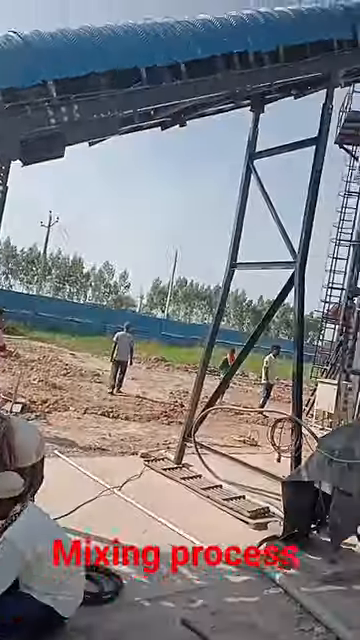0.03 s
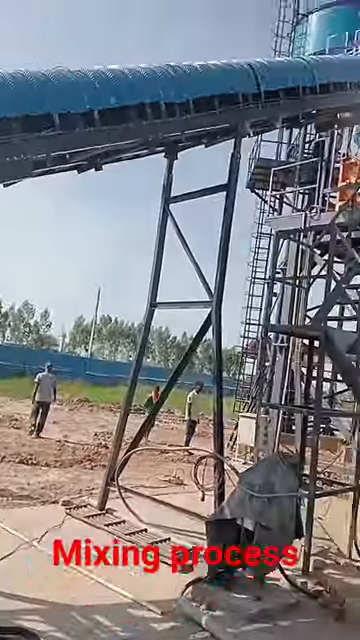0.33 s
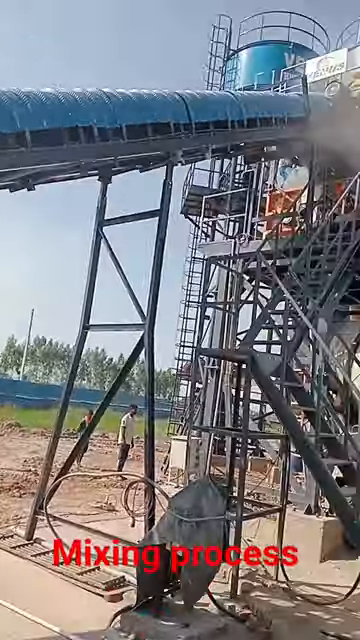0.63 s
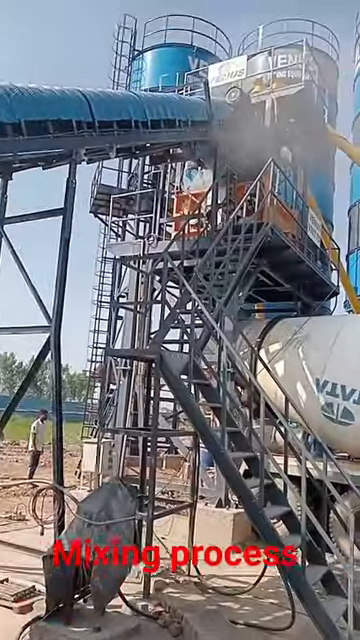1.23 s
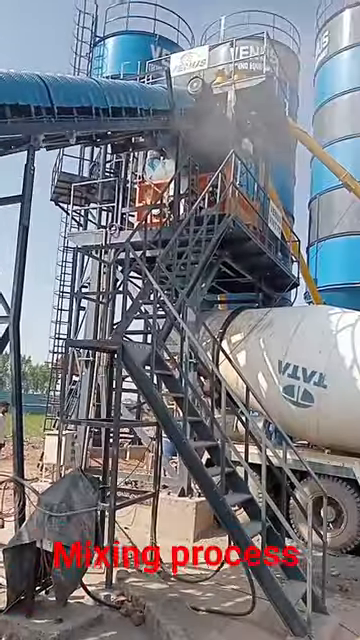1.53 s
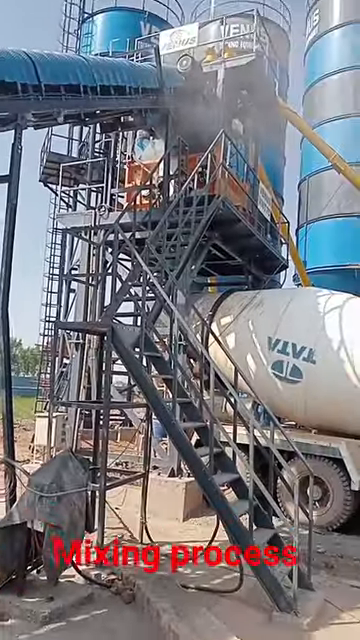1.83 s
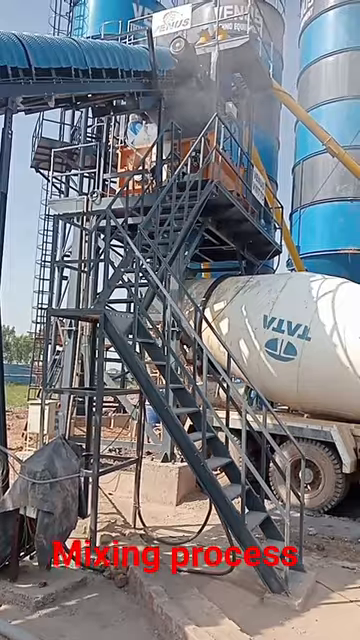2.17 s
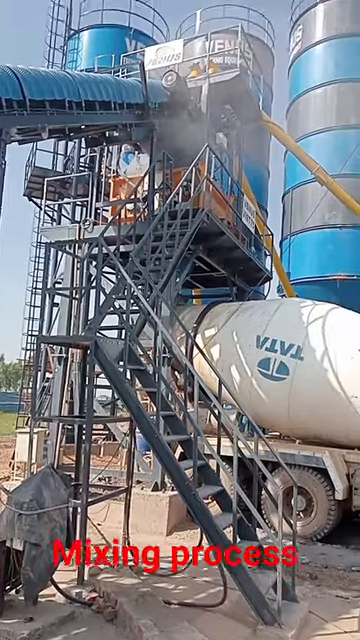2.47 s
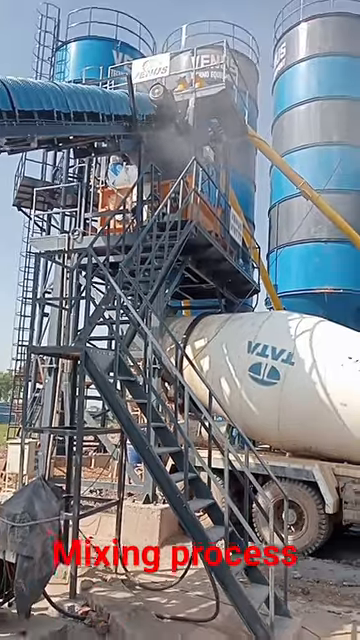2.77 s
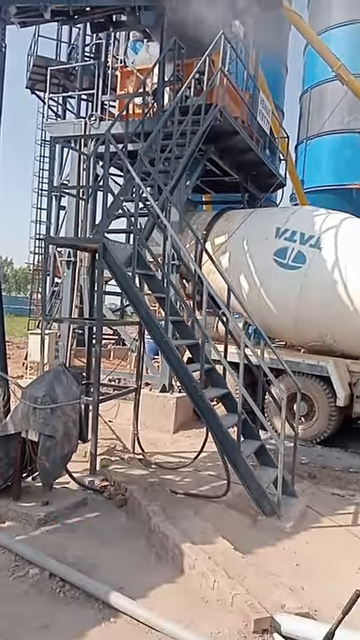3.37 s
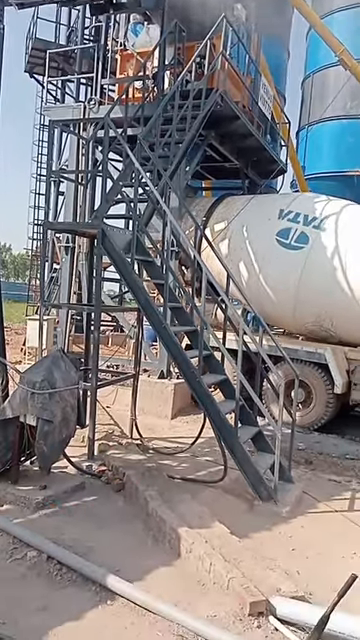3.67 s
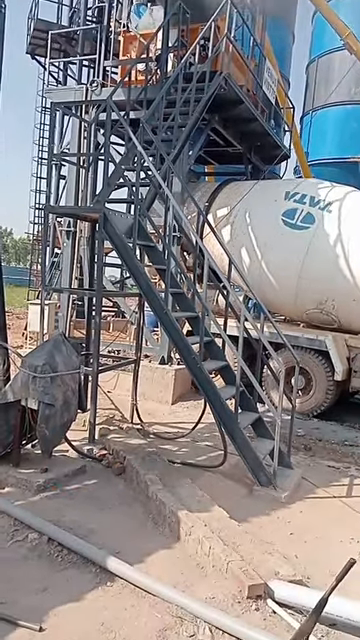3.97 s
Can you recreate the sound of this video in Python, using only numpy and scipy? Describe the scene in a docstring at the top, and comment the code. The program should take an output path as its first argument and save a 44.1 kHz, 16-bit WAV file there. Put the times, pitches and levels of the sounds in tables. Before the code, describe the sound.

A vibrating steel hopper rattles and drones at an outdoor concrete plant while gravel hisses down a chute and dry steel squeals. A mixer truck roars low behind it. Just before the end, the drone cuts out.

```python
"""Outdoors at a concrete batching plant, a steel hopper discharges into a mixer truck.
Shaken about a hundred times a second, the hopper rattles, drones and groans in forced vibration;
just before the end the drone cuts out and the rattle drops. Gravel and air hiss, scrape and chirp
down the chute, a thin whistle sinks as the air pressure falls, and dry steel squeals in pulses.
Behind them the mixer roars and booms softly over the truck's idling diesel."""
import sys
import numpy as np
from scipy import signal
from scipy.fft import rfft, irfft
from scipy.io import wavfile

SR = 44100
rng = np.random.default_rng(int(sys.argv[2]) if len(sys.argv) > 2 else 0)


def wav_record(signal):
    """Record a signal, one row per channel, as 16-bit PCM in the file named by sys.argv[1]."""
    frames = np.transpose(np.atleast_2d(signal))
    bounded = np.clip(frames, -1, 1)
    # unit amplitude maps onto the largest positive 16-bit level
    quanta = np.round(bounded * 32767).astype(np.int16)
    wavfile.write(sys.argv[1], SR, quanta)


N = 176400
SHAKE_HZ = 99.67

# Levels are in decibels; modes, partials and spectra are relative to their source's envelope.
# Envelope of the rattle: time_s, level_db
RATTLE_ENVELOPE = [(0, -23.5), (.54, -23.5), (.71, -23), (.92, -21.5), (1.28, -17.5), (1.42, -22),
                   (1.63, -16.5), (2.15, -17), (2.6, -18.5), (2.9, -21), (3.0, -17.5), (3.06, -21.5),
                   (3.42, -19), (3.64, -22), (3.88, -17.5), (3.93, -28.5)]
# Normal modes of the hopper: pitch_hz, bandwidth_hz, level_db
HOPPER_MODES = [(726, 58, -6), (815, 68, -0.5), (877.7, 57, -0.5), (979, 131, -2.5), (1116, 124, -7.5),
                (1447, 61, -13), (1730, 165, -13), (1865, 140, -12)]
# Tones that ring with the rattle: pitch_hz, level_db
RINGING_TONES = [(712, -14.5), (801, -11.5), (817, -10), (887, -19.5), (990, -9.5), (1114, -17.5)]
# Envelope of the drone: time_s, level_db
DRONE_ENVELOPE = [(0, -52), (.22, -36.5), (.57, -24), (.62, -50), (.8, -35), (1.14, -37), (1.28, -26.5),
                  (1.62, -24), (2.34, -24), (2.47, -33), (2.54, -24), (3.87, -27.5), (3.91, -53)]
# Weaker partials beside the drone's main tone: pitch_hz, level_db
DRONE_PARTIALS = [(606, -8.5), (395, -25.5)]
# Groans of the hopper's plates: centre_s, length_s, pitch_hz, level_db
GROANS = [(0.146, 0.47, 745, -31), (0.218, 0.18, 992, -27), (.64, 0.15, 995, -25),
          (0.774, 0.096, 745, -24.5), (0.776, 0.062, 845, -19.5), (1.003, 0.36, 828, -22.5),
          (1.084, 0.054, 1120, -20), (1.2, .08, 865, -30), (1.52, 0.13, 1000, -21), (3.156, 0.11, 998, -17)]
# Envelopes of the chute's two hiss bands: time_s, low_level_db, high_level_db
HISS_ENVELOPES = [(0.0, -21, -24), (0.25, -22, -23.5), (1.06, -20.5, -24), (2.45, -20.5, -25),
                  (2.85, -22.5, -26.5), (3.1, -23, -25.5), (4.0, -24.5, -25)]
# Spectral density of the lower hiss: frequency_hz, level_db
LOW_HISS_SPECTRUM = [(1200, -1), (2000, 4), (2250, -4), (2500, 2), (3200, -1), (3850, -1.5), (4400, -4),
                     (4750, -2), (6000, 0), (7000, -1.5)]
# Spectral density of the upper hiss: frequency_hz, level_db
HIGH_HISS_SPECTRUM = [(7000, 5), (7450, 0.5), (8700, 1.5), (9400, 0), (10700, 1.5), (12500, -3.5),
                      (15400, -5)]
# Normal modes of the chute: pitch_hz, bandwidth_hz, level_db
CHUTE_MODES = [(2473, 89, -3.5), (3524, 88, -4), (4770, 164, -0.5), (5250, 150, 5), (5470, 106, 0.5),
               (7090, 89, -12.5)]
# Scrapes of gravel: centre_s, length_s, pitch_hz, level_db
SCRAPES = [(1.84, 2.2, 13600, -35), (2.43, 0.16, 9400, -34), (2.43, 0.17, 9200, -31.5)]
# Glide of the air whistle: time_s, pitch_hz, level_db
WHISTLE_GLIDE = [(0, 9240, -41), (.1, 9140, -28.5), (.27, 8930, -27), (.33, 8900, -35), (.58, 8800, -30.5),
                 (.76, 8530, -38), (1.3, 8000, -41), (1.75, 7750, -37), (2.1, 7630, -44), (2.3, 7560, -60)]
# Squeals of dry steel: centre_s, length_s, pitch_hz, level_db
SQUEALS = [(0.155, 0.98, 4290, -32), (0.118, 0.28, 3630, -36), (.76, 0.55, 4104, -27),
           (1.127, 0.51, 4047, -28.5), (.95, .9, 7130, -32.5), (0.948, 0.48, 6240, -31),
           (1.0, 0.48, 5310, -30), (1.2, 0.79, 10700, -34.5), (1.57, 0.55, 9750, -32),
           (2.002, 0.79, 1830, -26), (2.002, 0.37, 7960, -35), (2.298, 1.3, 5230, -33.5),
           (2.398, 0.35, 3570, -31.5), (2.5, 0.11, 4680, -29.5), (2.995, 2, 4030, -37.5),
           (3.35, 0.86, 12270, -36)]
# Envelope of the mixer's roar: time_s, level_db
ROAR_ENVELOPE = [(0, -34.5), (2.2, -35), (2.45, -33.5), (3.4, -36)]
# Spectral density of the roar: frequency_hz, level_db
ROAR_SPECTRUM = [(25, -29), (45, -20), (65, -10), (110, -8), (150, -1.5), (220, 2.5), (275, -0.5), (340, 4),
                 (450, -1), (640, -3), (1300, -2), (2200, -18)]
# Booms of loads tumbling in the mixer: centre_s, level_db
BOOMS = [(2.48, -30.5), (3.0, -32.5)]
# Orders of the idling diesel: pitch_hz, level_db
ENGINE_ORDERS = [(62.7, -55), (75.3, -51), (100.3, -57.5), (199, -50.5)]


def hopper_rattle(jitter_s=0.001319, blow_spread_db=4, surge_db=0.74):
    """Impact excitation: each shake strikes every mode a loose blow, and some tones ring on."""
    shakes_s = np.arange(0, N / SR, 1 / SHAKE_HZ)
    plates = 0
    for hz, width_hz, db in HOPPER_MODES:
        lateness, strength = rng.standard_normal((2, 1024))[:, :len(shakes_s)]
        onsets = ((shakes_s + jitter_s * lateness) * SR).astype(int) % N
        blows = np.zeros(N)
        blows[onsets] = from_db(blow_spread_db * strength)
        mode = filtered(blows, lambda f: resonance(f, hz, width_hz) ** 2)
        plates += from_db(db) * np.sqrt(width_hz) * mode
    ringing = sum(from_db(db) * tone(hz, waver_db=2.5, wander_hz=5.1, rate_hz=7.6)
                  for hz, db in RINGING_TONES)
    drone_db, = curves(DRONE_ENVELOPE)
    ringing *= from_db(0.2 * (drone_db - drone_db.max()))  # strongest while the walls drone
    level_db, = curves(RATTLE_ENVELOPE)
    envelope = from_db(level_db + surge_db * drift(rate_hz=38))
    return envelope * (from_db(-1) * unit_power(plates) + ringing)


def hopper_drone(main_hz=501):
    """Forced vibration: the walls sing near harmonics of the shaking; the fifth meets a resonance."""
    level_db, = curves(DRONE_ENVELOPE)
    main = tone(main_hz, waver_db=1.5, wander_hz=2, rate_hz=17.7)
    partials = sum(from_db(db) * tone(hz, waver_db=4, wander_hz=2.6, rate_hz=11)
                   for hz, db in DRONE_PARTIALS)
    wall = from_db(0.32 * level_db - 21.5) * noise_band(hz=520.5, width_hz=76)
    return from_db(level_db - 1.85) * (main + partials) + wall


def hopper_groans():
    """Plate vibration: as the load shifts, one plate after another swells into a wavering tone."""
    return sum(from_db(db) * swell(centre_s, length_s) * tone(hz, waver_db=4, wander_hz=12.1, rate_hz=25)
               for centre_s, length_s, hz, db in GROANS)


def chute_flow(shake_depth=0.055, flicker_db=0.87):
    """Flow noise: sand and air hiss among the stones, and the shaking modulates the amplitude."""
    low_db, high_db = curves(HISS_ENVELOPES)
    ticks = from_db(-7) * stone_ticks()
    low_hiss = from_db(-1.74 + flicker_db * drift(rate_hz=24)) * shaped_noise(LOW_HISS_SPECTRUM)
    chirps = from_db(-6) * stone_chirps()
    high_hiss = from_db(-1.96 + flicker_db * drift(rate_hz=30)) * shaped_noise(HIGH_HISS_SPECTRUM)
    flow = from_db(low_db) * (low_hiss + ticks + chirps) + from_db(high_db) * high_hiss
    return flow * (1 + shake_depth * np.sin(2 * np.pi * SHAKE_HZ * np.arange(N) / SR))


def stone_ticks(hits_per_s=3200, spread_db=3.5, waver_db=1.8):
    """Shot noise: stones strike at random instants and ring each mode of the steel chute."""
    ticks = 0
    for hz, width_hz, db in CHUTE_MODES:
        strengths = from_db(spread_db * np.minimum(rng.exponential(1, N), 5))
        signs = rng.choice([-1, 1], N)
        hits = strengths * signs * (rng.random(N) < hits_per_s / SR)
        gain = from_db(db + waver_db * drift(rate_hz=6)) * np.sqrt(width_hz)
        ticks += gain * filtered(hits, lambda f: resonance(f, hz, width_hz))
    return unit_power(ticks)


def stone_chirps(low_hz=2289, high_hz=11690, count=30, spread_db=13.5):
    """Frictional excitation: sliding stones make narrow resonances flare, each in its own time."""
    pitches_hz = np.linspace(low_hz, high_hz, count)
    flares = [from_db(spread_db * np.minimum(drift(rate_hz=5.6), 1)) for _ in pitches_hz]
    return unit_power(sum(flare * tone(hz, waver_db=4, wander_hz=44.7, rate_hz=60)
                          for flare, hz in zip(flares, pitches_hz)))


def gravel_scrapes(relative_width=0.075):
    """Sliding friction: gravel drags over the steel in bright swells of noise."""
    return sum(from_db(db) * swell(centre_s, length_s) * noise_band(hz, relative_width * hz)
               for centre_s, length_s, hz, db in SCRAPES)


def air_whistle():
    """Aerodynamic tone: escaping air whistles ever lower as its pressure falls."""
    hz, db = curves(WHISTLE_GLIDE)
    return from_db(db) * tone(hz, waver_db=2, wander_hz=16.9, rate_hz=32)


def steel_squeals(pulse_hz=48.2, pulse_depth=0.4):
    """Friction-induced vibration: dry steel rubs once per turn, so its rough tones pulse."""
    turns = np.cumsum(pulse_hz + 4 * drift(rate_hz=14.4)) / SR
    squeals = 0
    for centre_s, length_s, hz, db in SQUEALS:
        rough_tone = tone(hz, waver_db=4, wander_hz=0.00698 * hz, rate_hz=70.7)
        squeals += from_db(db) * swell(centre_s, length_s) * rough_tone
    return squeals * unit_power(1 + pulse_depth * np.sin(2 * np.pi * turns))


def mixer_roar(churn_db=2):
    """Random modulation: the mixer's churning makes its low, broadband noise fluctuate."""
    level_db, = curves(ROAR_ENVELOPE)
    return from_db(level_db + 5.5 + churn_db * drift(rate_hz=26)) * shaped_noise(ROAR_SPECTRUM)


def mixer_booms():
    """Shell resonance: tumbling loads raise soft, dull swells in the mixer's wall."""
    envelope = sum(from_db(db) * swell(centre_s, length_s=0.12) for centre_s, db in BOOMS)
    return envelope * noise_band(hz=233, width_hz=60)


def diesel_idle():
    """Periodic excitation: the idling engine hums at its orders, nearly steady in pitch."""
    return sum(from_db(db) * tone(hz, waver_db=-0.5, wander_hz=0.68, rate_hz=6.6)
               for hz, db in ENGINE_ORDERS)


def from_db(db):
    """The decibel scale: a level as an amplitude ratio."""
    return 10 ** (np.asarray(db) / 20)


def unit_power(x):
    """Normalisation to a mean square of one."""
    return x / np.sqrt(np.mean(x ** 2) + 1e-20)


def curves(rows):
    """Linear interpolation in time: each level or pitch column at every sample."""
    times_s, *columns = np.transpose(rows)
    return [np.interp(np.arange(N) / SR, times_s, column) for column in columns]


def swell(centre_s, length_s):
    """Gaussian envelope, its length taken between the 1/e points."""
    return np.exp(-(2 * (np.arange(N) / SR - centre_s) / length_s) ** 2)


def drift(rate_hz, size=4096):
    """Low-pass random fluctuation with zero mean and unit variance."""
    f = np.arange(size // 2 + 1) * SR / N
    spectrum = rfft(rng.standard_normal(size)) * (f > 0) / (1 + (f / rate_hz) ** 2)
    slow = unit_power(irfft(spectrum, size))
    return np.interp(np.linspace(0, size - 1, N), np.arange(size), slow)


def tone(hz, waver_db, wander_hz, rate_hz):
    """Random amplitude and frequency modulation of a sine, at unit power."""
    cycles = np.cumsum(hz + wander_hz * drift(rate_hz)) / SR + rng.random()
    return unit_power(np.sin(2 * np.pi * cycles) * from_db(waver_db * drift(rate_hz)))


def resonance(f, hz, width_hz):
    """Frequency response of a damped oscillator, one at its peak."""
    return 1j * f * width_hz / (hz ** 2 - f ** 2 + 1j * f * width_hz)


def filtered(x, response):
    """Linear filtering: the spectrum times a frequency response, scaled to unit power."""
    f = np.arange(N // 2 + 1) * SR / N
    return unit_power(irfft(rfft(x) * response(f), N))


def noise_band(hz, width_hz):
    """Band-pass filtering: white noise through two like resonances in cascade."""
    return filtered(rng.standard_normal(N), lambda f: resonance(f, hz, width_hz) ** 2)


def shaped_noise(spectrum):
    """Spectral shaping: white noise takes the given spectrum and falls steeply outside it."""
    hz, db = np.transpose(spectrum)
    def response(f):
        skirts = np.sqrt((1 + (hz[0] / (f + 1)) ** 24) * (1 + (f / hz[-1]) ** 48))
        return from_db(np.interp(np.log(f + 1), np.log(hz), db)) / skirts
    return filtered(rng.standard_normal(N), response)


def scene():
    """Superposition: all sources add at one point, alike in both channels."""
    hopper = hopper_rattle() + hopper_groans() + hopper_drone()
    discharge = chute_flow() + gravel_scrapes() + air_whistle() + steel_squeals()
    truck = mixer_roar() + diesel_idle() + mixer_booms()
    plant = hopper + discharge + truck
    return np.array([plant, plant])


def record(dry, cutoff_hz=15500):
    """Band limiting: an elliptic low-pass cuts the highest treble steeply."""
    return signal.sosfilt(signal.ellip(12, .1, 90, cutoff_hz, fs=SR, output="sos"), dry)


dry = scene()
out = record(dry)
wav_record(out)
```